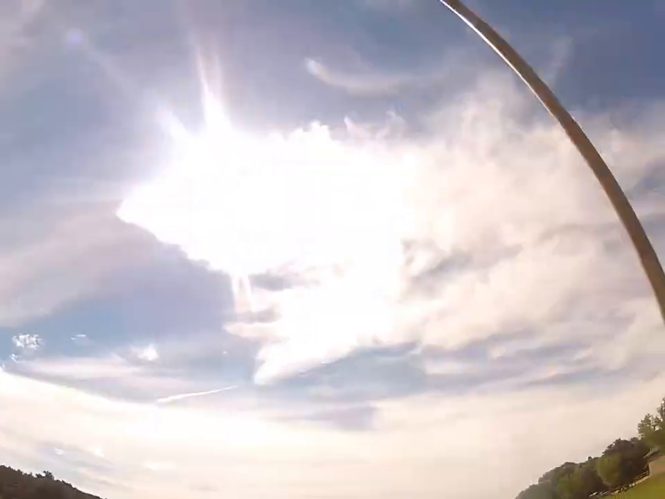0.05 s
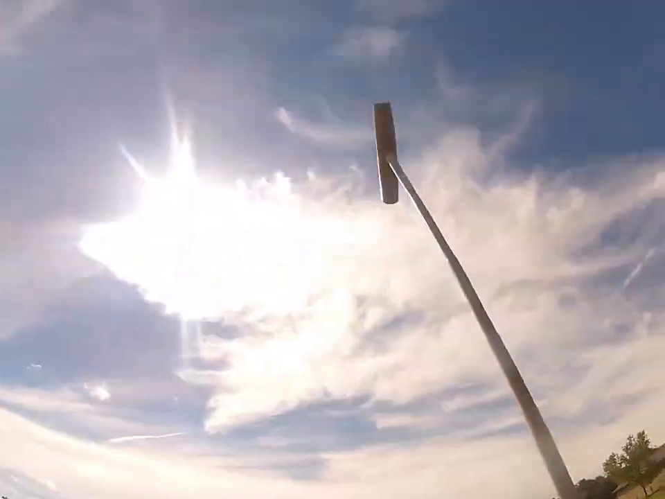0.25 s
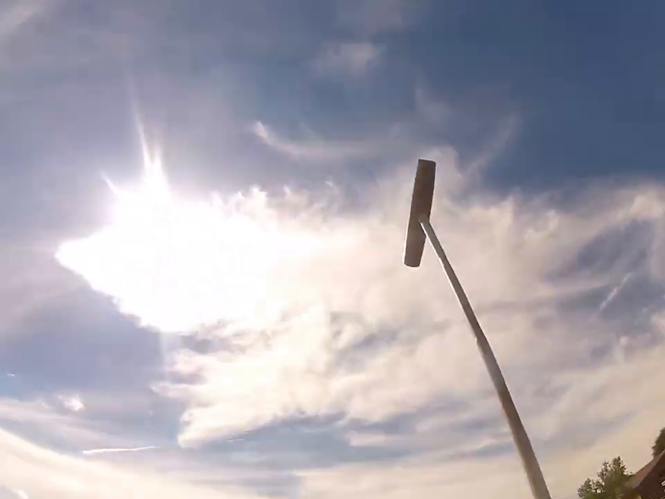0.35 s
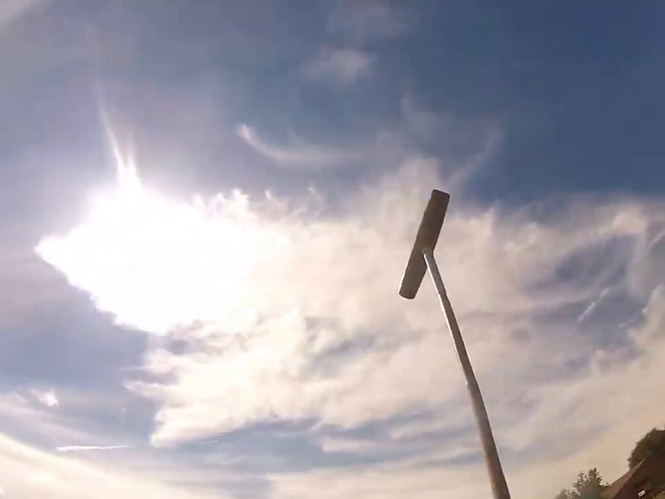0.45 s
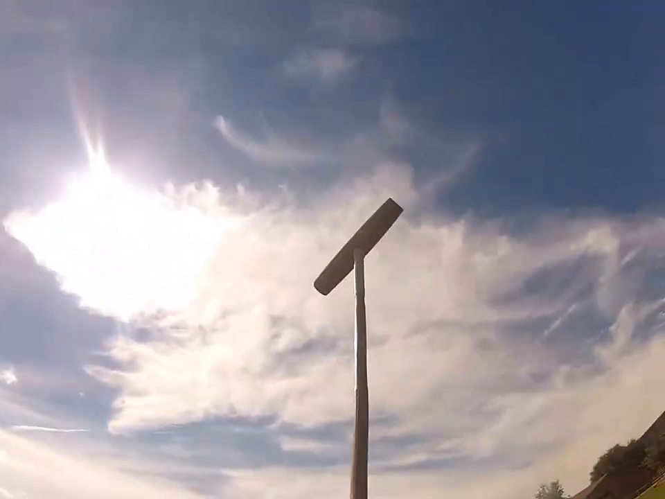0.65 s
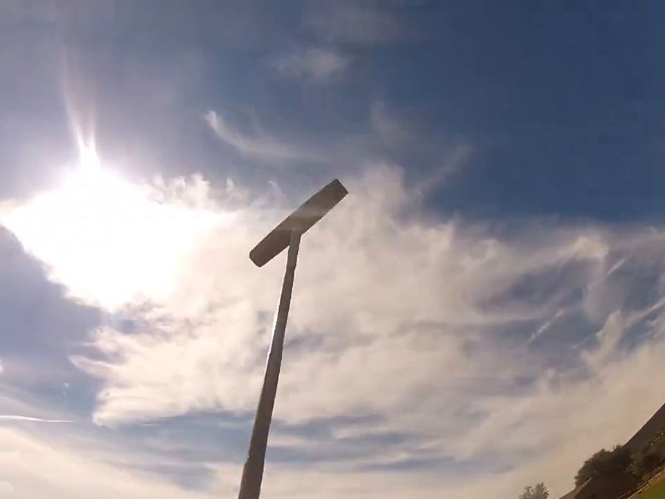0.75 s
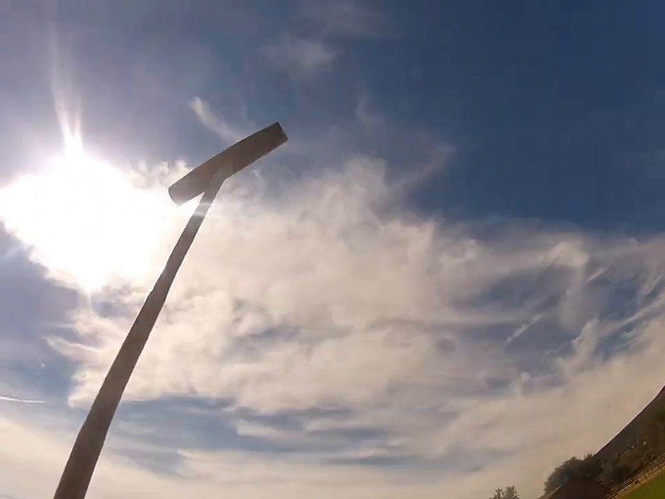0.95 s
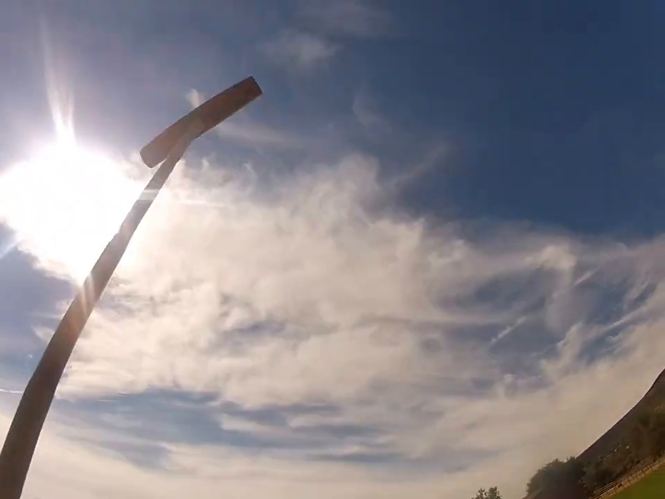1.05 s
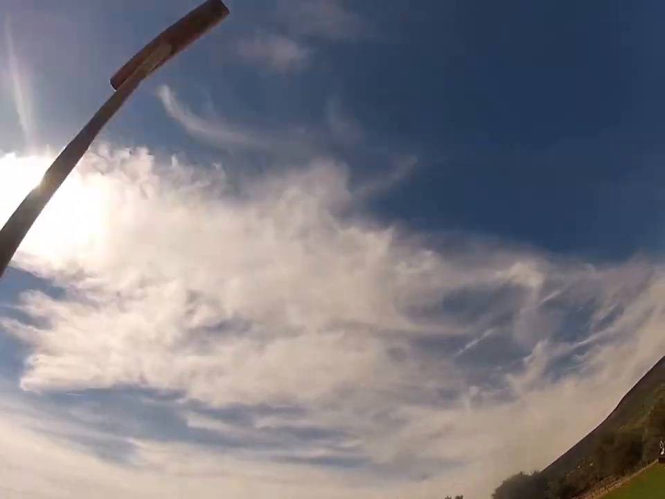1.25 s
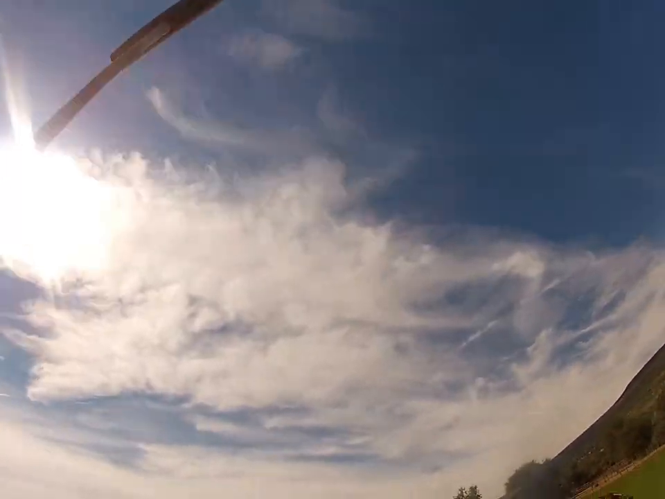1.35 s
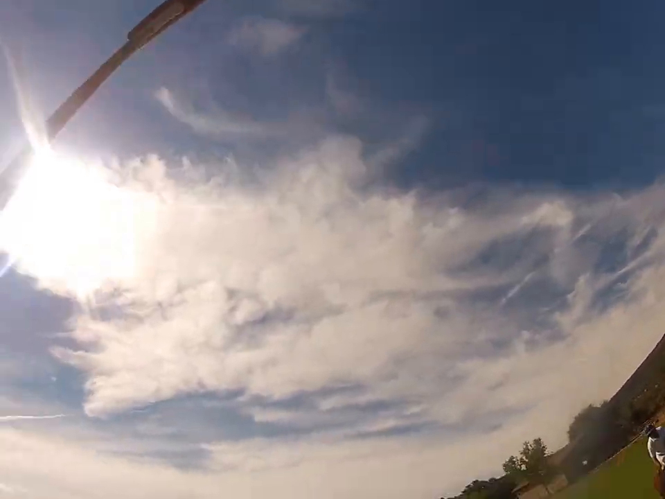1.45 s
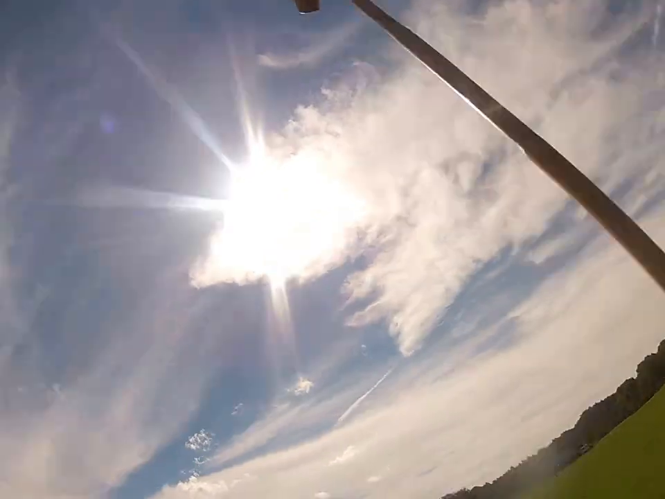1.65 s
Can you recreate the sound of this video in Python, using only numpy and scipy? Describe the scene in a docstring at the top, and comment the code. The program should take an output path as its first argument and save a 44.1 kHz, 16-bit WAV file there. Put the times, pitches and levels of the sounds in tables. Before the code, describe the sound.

Dull hoof beats on grass, close and muffled through a small camera's plastic housing. An early hard knock and overloading jolt give way to quieter uneven thuds, buckle ticks, cloth scrapes and fitful low air rumble outdoors.

```python
"""Gallop over turf

A horse gallops over turf, heard from a small camera worn by the rider.
Hooves thud dully as ringing tones mixed with noise; hard jolts push the mount, and one overloads the microphone.
Hard contacts ring the housing, tack ticks in short bursts, and straps and cloth scrape as crowds of tiny clicks.
Behind them, shaped noise makes the air's rumble, a steady drone and a faint rustle.
"""
import sys
import numpy as np
from scipy import signal
from scipy.fft import rfft, irfft
from scipy.io import wavfile

SR = 44100
rng = np.random.default_rng(int(sys.argv[2]) if len(sys.argv) > 2 else 0)


def wav_record(signal):
    """Record a signal, one row per channel, as 16-bit PCM in the file named by sys.argv[1]."""
    frames = np.transpose(np.atleast_2d(signal))
    bounded = np.clip(frames, -1, 1)
    # unit amplitude maps onto the largest positive 16-bit level
    quanta = np.round(bounded * 32767).astype(np.int16)
    wavfile.write(sys.argv[1], SR, quanta)


N = 74970  # length in samples, 1.7 s


def seconds_since(start_s):
    return np.arange(N) / SR - start_s


def gain(level_db):
    """Turn decibels into a multiplier."""
    return 10 ** (np.asarray(level_db) / 20)


def level_over_time(rows):
    """Multiplier that follows a table of time_s, level_db."""
    time_s, level_db = np.array(rows).T
    return gain(np.interp(seconds_since(0), time_s, level_db))


def colour(sound, points):
    """Shape the spectrum by pitch_hz, level_db points, then set the overall rms to 1."""
    pitch_hz, level_db = np.array(points).T
    bins_hz = np.maximum(np.arange(N // 2 + 1) * SR / N, 1)
    shape_db = np.interp(np.log(bins_hz), np.log(pitch_hz), level_db)
    shaped = irfft(rfft(sound) * gain(shape_db), N)
    return shaped / shaped.std()


def noise(points):
    """Random noise with a given colour and an rms of 1."""
    return colour(rng.standard_normal(N), points)


def tilted(points, tilt_db_per_octave):
    """A colour tilted about 2 kHz: positive is brighter, negative is duller."""
    return [(hz, db + tilt_db_per_octave * np.log2(hz / 2000)) for hz, db in points]


def contact(start_s, attack_s):
    """A soft contact takes hold in a straight line from 0 to 1."""
    return np.clip(seconds_since(start_s) / attack_s, 0, 1)


def blow(start_s, attack_s, decay_s):
    """A straight attack from silence, then an exponential fall."""
    time_falling = np.maximum(seconds_since(start_s) - attack_s, 0)
    return contact(start_s, attack_s) * np.exp(-time_falling / decay_s)


def swell(peak_s, rise_s, decay_s):
    """An exponential rise to a peak and an exponential fall."""
    t = seconds_since(peak_s)
    return np.exp(np.where(t < 0, t / rise_s, -t / decay_s))


def ring(start_s, modes):
    """A struck body rings as fading sine tones; each falls by 60 dB in its own t60_s."""
    t = np.maximum(seconds_since(start_s), 0)
    ringing = 0
    for pitch_hz, level_db, t60_s in modes:
        fade = np.exp(-np.log(1000) * t / t60_s)
        ringing = ringing + gain(level_db) * np.sin(2 * np.pi * pitch_hz * t) * fade
    return ringing


# Hoof beats on turf: start_s, thud_level_db, knock_level_db, knock_decay_s, pitch_ratio
HOOF_BEATS = [(0.2351, -23, -26, 0.0064, 1.35), (.418, -43, -51.5, 0.0027, 0.92),
              (0.541, -40.5, -56, 0.0066, 0.75), (.616, -42.5, -38.5, .005, 1.07),
              (0.8142, -36, -35.5, 0.0042, 1.055), (.834, -49, -43, 0.009, 0.9),
              (0.849, -41.5, -38, 0.0059, 1.1), (0.9648, -38.5, -43.5, 0.004, 0.98),
              (1.046, -43, -62, .005, 0.93), (1.42, -43, -42, 0.0023, .9), (1.433, -41, -41, 0.0076, 0.96),
              (1.528, -36.5, -50, 0.0089, 0.99), (1.573, -38.5, -39.5, 0.0034, 1.01),
              (1.669, -43, -43.5, 0.0055, 1)]
# Hollow tones of a hoof, before the pitch ratio: pitch_hz, level_db, t60_s
HOOF_TONES = [(613, -3.5, 0.04), (764, -1.5, 0.041), (1078, -8, 0.041), (1283, -7, 0.026), (1570, -12, .02)]
# Low tones of the ground, before the pitch ratio: pitch_hz, level_db, t60_s
GROUND_TONES = [(67, -15.5, 0.023), (103.7, 3.5, 0.072), (194, -1, 0.065), (250, 2, 0.025)]
# Noise colours of the thud and the knock: pitch_hz, level_db
THUD_COLOUR = [(30, 6), (70, 3.5), (115, 6), (200, -0.5), (300, -35), (500, -54), (1200, -50)]
KNOCK_COLOUR = [(150, -7), (350, -33), (580, 13.5), (780, 3), (1200, 0), (1750, -21), (2600, -24.5),
                (6000, -27), (15000, -17)]
KNOCK_ATTACK_S, THUD_ATTACK_S, THUD_DECAY_S = 0.00095, 0.00258, 0.02
THUD_NOISE_DB, KNOCK_NOISE_DB = 0, -5.5  # noise level within each beat


def hooves():
    """Each hoof gives a short hollow knock and a longer ground thud, both part ring and part crushed turf."""
    thud_noise = gain(THUD_NOISE_DB) * noise(THUD_COLOUR)
    knock_noise = gain(KNOCK_NOISE_DB) * noise(KNOCK_COLOUR)
    beats = 0
    for start_s, thud_db, knock_db, knock_decay_s, pitch_ratio in HOOF_BEATS:
        hoof_tones = [(hz * pitch_ratio, db, t60_s) for hz, db, t60_s in HOOF_TONES]
        knock = ring(start_s, hoof_tones) * contact(start_s, KNOCK_ATTACK_S)
        knock = knock + knock_noise * blow(start_s, KNOCK_ATTACK_S, knock_decay_s)
        ground_tones = [(hz * pitch_ratio, db, t60_s) for hz, db, t60_s in GROUND_TONES]
        thud = ring(start_s, ground_tones) * contact(start_s, THUD_ATTACK_S)
        thud = thud + thud_noise * blow(start_s, THUD_ATTACK_S, THUD_DECAY_S)
        beats = beats + gain(knock_db) * knock + gain(thud_db) * thud
    return beats


# Jolts, the first already dying away: centre_s, push_width_s, push_level_db, sway_level_db, thin_ring_level_db
JOLTS = [(-.035, 0.0061, -25, -5, -4), (0.2393, 0.0019, -11, -36, -15), (0.2447, 0.00318, -12, -41, -25),
         (.279, 0.002915, 3, 2, 0.5)]
# Sway of the mount: pitch_hz, level_db, t60_s
SWAY_TONES = [(36.26, -17.5, 0.36), (106.1, -10.5, .17), (133, -26, 0.18), (197, -17, 0.059),
              (326, -21.5, 0.048)]
# Thin high ring of the mount, a close pair: pitch_hz, level_db
THIN_RING_PAIR = [(11897, -46), (12101, -54.5)]
THIN_RING_T60_S = 0.18


def mount():
    """A jolt shoves the camera out and back: its acceleration thumps, the mount sways and a thin ring fades."""
    thin_tones = [(hz, db, THIN_RING_T60_S) for hz, db in THIN_RING_PAIR]
    shaking = 0
    for centre_s, width_s, push_db, sway_db, thin_db in JOLTS:
        u = seconds_since(centre_s) / width_s
        push = (1 - u ** 2) * np.exp(-u ** 2 / 2)  # one peak between two dips
        ring_start_s = centre_s - width_s
        shaking = shaking + gain(push_db) * push
        shaking = shaking + gain(sway_db) * ring(ring_start_s, SWAY_TONES)
        shaking = shaking + gain(thin_db) * ring(ring_start_s, thin_tones)
    return shaking


# The housing rings: once at a tack clack, then faintly along with a hoof beat: start_s, level_db
HOUSING_HITS = [(.1387, -11), (.618, -33)]
# Ring of the plastic housing: pitch_hz, level_db, t60_s
HOUSING_TONES = [(602, -30, 0.055), (797, -24.5, 0.056), (1125, -26.5, 0.035), (1230, -19.5, 0.034),
                 (1530, -25, 0.045), (1730, -2.5, 0.016), (2112, -12.5, 0.019), (2270, -24, 0.025),
                 (3850, -28.5, .049), (7900, -32.5, 0.045), (9990, -19, .014), (10270, -17, .018),
                 (13800, -23, 0.012), (13700, -23, 0.015)]
CRACK_DB, CRACK_ATTACK_S, CRACK_DECAY_S = -26.5, 0.00011, 0.0058
HOUSING_LOW_HZ, DIP_HZ, DIP_Q = 486, 5820, 0.95


def housing():
    """Hard contacts ring the plastic housing, which is too small for bass and has a dip in its treble."""
    crack_noise = gain(CRACK_DB) * noise(RUB_COLOUR)
    body = 0
    for start_s, level_db in HOUSING_HITS:
        crack = crack_noise * blow(start_s, CRACK_ATTACK_S, CRACK_DECAY_S)
        body = body + gain(level_db) * (ring(start_s, HOUSING_TONES) + crack)
    bass_cut = signal.butter(4, HOUSING_LOW_HZ, "high", fs=SR, output="sos")
    body = signal.sosfilt(bass_cut, body)
    dip_b, dip_a = signal.iirnotch(DIP_HZ, DIP_Q, fs=SR)
    return signal.lfilter(dip_b, dip_a, body)


# Small ticks of buckles and straps: start_s, level_db, tilt_db_per_octave
TICKS = [(0.2426, -31, 2), (0.272, -19, 1), (0.2766, -12.5, -6), (.358, -42, -6.5), (1.0441, -42, -11),
         (1.5285, -34.5, 0), (1.5447, -33, 1), (1.608, -38.5, -1), (1.6177, -38, -1), (1.627, -41, -3)]
# Colour of a tick before its tilt: pitch_hz, level_db
TICK_COLOUR = [(200, -32), (600, -21), (1100, -5.5), (1700, -4), (2300, 9.5), (3100, -7.5), (3750, -2.5),
               (4400, -16), (6000, -21.5), (7300, -21), (8400, -7.5), (9800, -18), (11500, -19),
               (12800, -18), (14300, -7), (15600, -23)]
TICK_ATTACK_S, TICK_DECAY_S = 0.00053, 0.0016
# Colour of the one creak: pitch_hz, level_db
CREAK_COLOUR = [(1000, -23), (2600, 8.5), (3300, 6), (3800, 2), (5500, -30), (8700, -1), (11000, -12),
                (15000, -13)]
CREAK_S, CREAK_DB, CREAK_ATTACK_S, CREAK_DECAY_S = 0.801, -45.5, 0.0018, 0.0054


def ticks():
    """Buckles and straps snap as brief bursts of noise, and once give a high creak."""
    snaps = 0
    for start_s, level_db, tilt in TICKS:
        snap = noise(tilted(TICK_COLOUR, tilt)) * blow(start_s, TICK_ATTACK_S, TICK_DECAY_S)
        snaps = snaps + gain(level_db) * snap
    creak = noise(CREAK_COLOUR) * blow(CREAK_S, CREAK_ATTACK_S, CREAK_DECAY_S)
    return snaps + gain(CREAK_DB) * creak


# Straps and cloth scraping: peak_s, rise_s, decay_s, level_db, tilt_db_per_octave
SCRAPES = [(0.075, 0.0022, 0.0046, -50.5, -0.5), (0.0848, 0.0011, 0.0065, -44.5, -5),
           (.238, 0.00033, 0.0033, -44.5, -2), (0.253, 0.0069, 0.007, -25.5, -2),
           (.267, 0.0024, 0.0031, -26, 0), (0.274, 0.0035, 0.0033, -20.5, 1),
           (0.285, 0.0018, 0.0057, -27, 0), (.303, 0.0046, 0.017, -56, 1.5),
           (0.359, 0.0029, 0.0055, -40.5, 1), (0.38, 0.003, 0.012, -51, -.5),
           (.458, 0.006, 0.0047, -44.5, 0.5), (0.499, 0.0019, 0.0084, -54, 0),
           (0.633, 0.018, 0.043, -50.5, -0.5), (0.864, 0.021, 0.011, -54, 0),
           (0.919, 0.017, 0.016, -49, -0.5), (0.979, 0.0064, 0.013, -43, -1),
           (1.01, 0.0054, 0.0065, -55, 0.5), (1.046, 0.0025, 0.011, -44, 1),
           (1.444, 0.006, 0.0052, -51.5, 0), (1.476, 0.0079, 0.025, -48.5, -1.5),
           (1.539, .016, 0.011, -34.5, 0), (1.572, 0.012, 0.0032, -39.5, 0.5),
           (1.611, 0.00088, 0.0072, -41, 0.5), (1.625, 0.0014, 0.0017, -43, 1.5),
           (1.695, 0.04, .02, -53, 0)]
# Colour of rubbing heard through the housing, also used by the housing's cracks: pitch_hz, level_db
RUB_COLOUR = [(150, -2), (450, -23.5), (750, -3), (900, -9), (1090, 4.5), (1290, -8), (1600, 2),
              (1950, 5.5), (2250, -2), (2520, 6), (2850, -12), (3050, -3), (3250, -21), (3750, -6),
              (4300, -21.5), (4800, -13.5), (6000, -30), (7400, -18.5), (8400, -20), (9800, -8),
              (11600, -27), (12700, -24), (14200, -11.5), (15000, -21), (15600, -35)]
SLIPS_PER_S, SLIP_SPREAD_DB = 2200, 2.5  # average rate, random spread of strength


def scrapes():
    """Straps and cloth rub as dense tiny slips, random clicks that swell and fade with each scrape."""
    happens = rng.random(N) < SLIPS_PER_S / SR
    direction = rng.choice([-1, 1], N)
    strength = gain(SLIP_SPREAD_DB * rng.standard_normal(N))
    slips = happens * direction * strength
    rubbing = 0
    for peak_s, rise_s, decay_s, level_db, tilt in SCRAPES:
        scrape = colour(slips, tilted(RUB_COLOUR, tilt)) * swell(peak_s, rise_s, decay_s)
        rubbing = rubbing + gain(level_db) * scrape
    return rubbing


# Rumble of the air: time_s, level_db
WIND_LEVEL = [(0, -24), (.1, -43.5), (.19, -34.5), (.26, -34.5), (.4, -33.5), (.47, -78), (.56, -35.5),
              (.7, -63), (.8, -42.5), (.94, -40), (1.1, -53), (1.35, -65), (1.47, -44), (1.6, -50),
              (1.7, -36.5)]
# Colour of the air's rumble: pitch_hz, level_db
WIND_COLOUR = [(12, 7), (25, -2.5), (42, 3), (65, -12), (115, -9.5), (200, -22.5), (330, -37.5),
               (550, -39.5), (4000, -83)]


def wind():
    """The air buffets the housing as low noise whose level comes and goes."""
    return noise(WIND_COLOUR) * level_over_time(WIND_LEVEL)


# Rustle of clothes and tack: time_s, level_db
RUSTLE_LEVEL = [(0, -64.5), (.12, -64), (.2, -61.5), (.33, -60), (.42, -61.5), (.55, -59.5), (.88, -58),
                (1, -59.5), (1.09, -61.5), (1.22, -59), (1.4, -63), (1.49, -55.5), (1.6, -62), (1.7, -58.5)]
# Colour of the rustle: pitch_hz, level_db
RUSTLE_COLOUR = [(300, 9.5), (600, 2.5), (1050, 2), (1350, -3.5), (1750, 0.5), (2350, 5.5), (2700, 0.5),
                 (3300, -5), (4700, -4.5), (6000, -22), (7400, -9.5), (9900, -10), (11500, -21.5),
                 (13000, -19.5), (14400, -11), (15500, -7)]


def rustle():
    """Clothes and tack rustle faintly as noise that never stops."""
    return noise(RUSTLE_COLOUR) * level_over_time(RUSTLE_LEVEL)


# Colour of the ride's steady drone: pitch_hz, level_db
DRONE_COLOUR = [(20, 8), (70, 0), (120, 4), (200, -4), (330, -15), (550, -22), (1200, -44), (4000, -41)]
DRONE_DB = -52


def drone():
    """The ride drones on as low noise at one level."""
    return gain(DRONE_DB) * noise(DRONE_COLOUR)


def scene():
    """Every sound adds up at the one microphone."""
    main_sounds = hooves() + mount() + housing() + ticks() + scrapes()
    background = wind() + rustle() + drone()
    return (main_sounds + background)[None]  # one channel


CLIP_DB, TOP_HZ = 0.5, 15300


def record(dry):
    """The recorder flattens peaks beyond its limit, then cuts the top of the treble."""
    limit = gain(CLIP_DB)
    clipped = np.clip(dry, -limit, limit)
    top_cut = signal.ellip(8, 0.2, 80, TOP_HZ, fs=SR, output="sos")  # 0.2 dB ripple, 80 dB cut
    return signal.sosfilt(top_cut, clipped)


dry = scene()
out = record(dry)
wav_record(out)
```